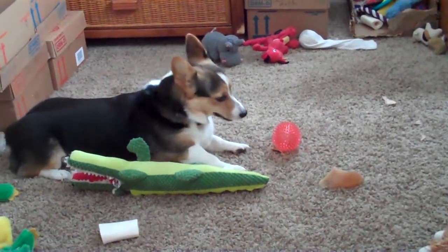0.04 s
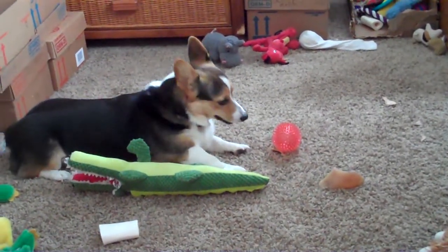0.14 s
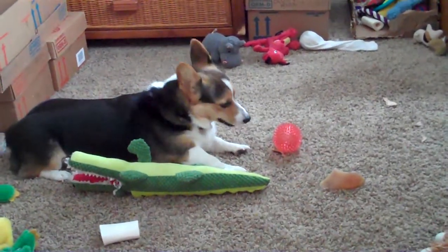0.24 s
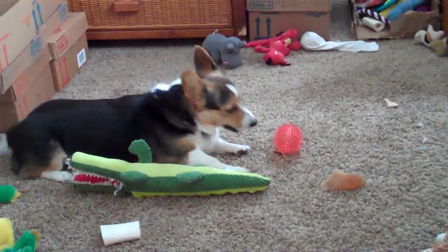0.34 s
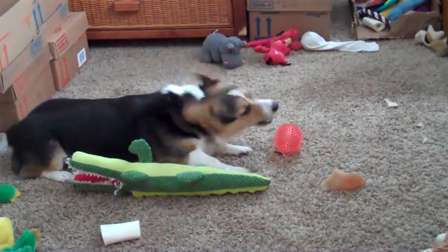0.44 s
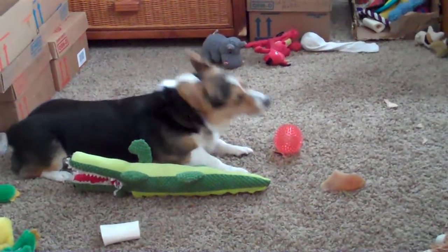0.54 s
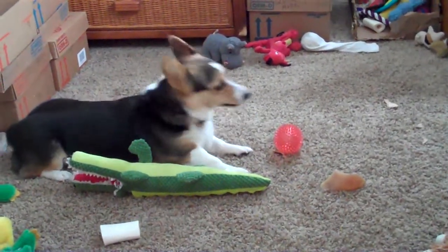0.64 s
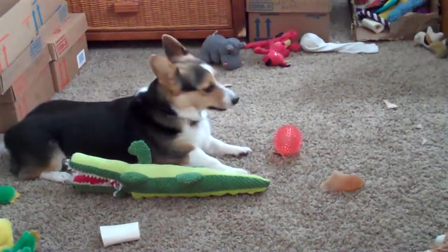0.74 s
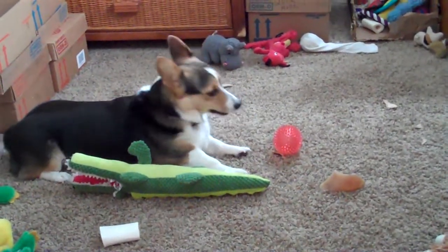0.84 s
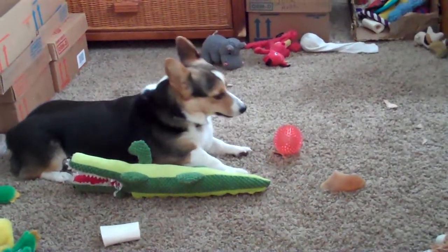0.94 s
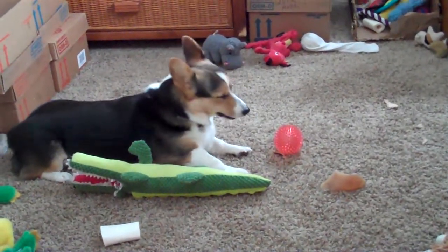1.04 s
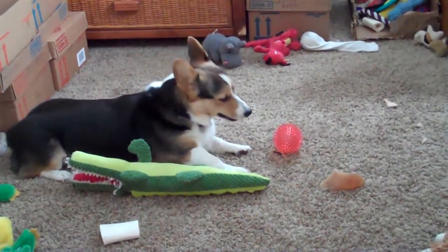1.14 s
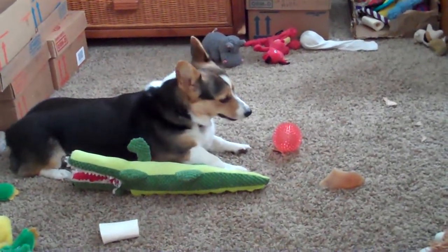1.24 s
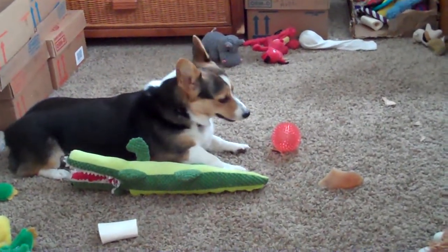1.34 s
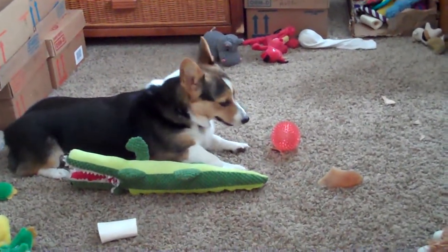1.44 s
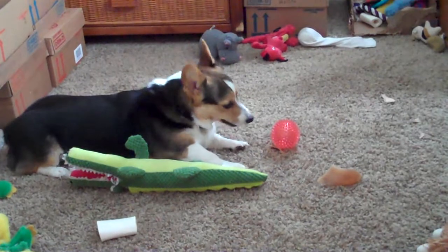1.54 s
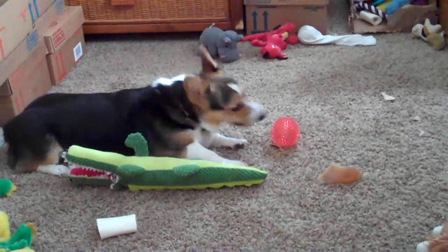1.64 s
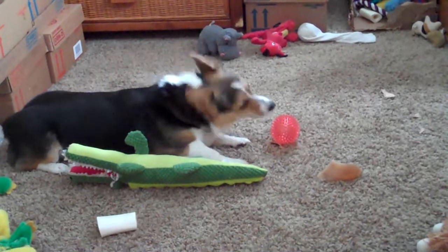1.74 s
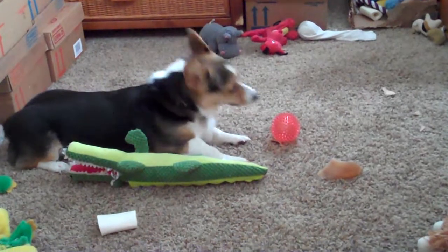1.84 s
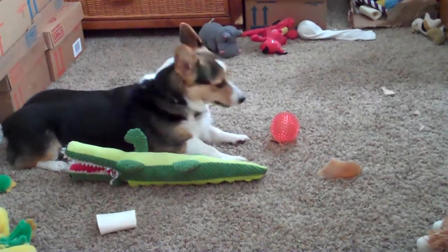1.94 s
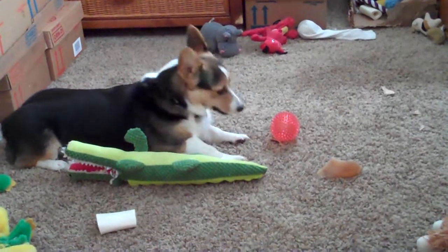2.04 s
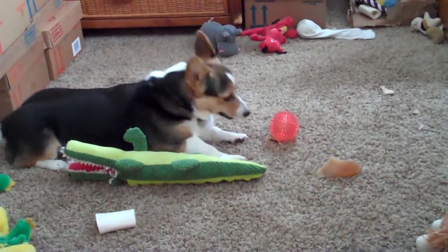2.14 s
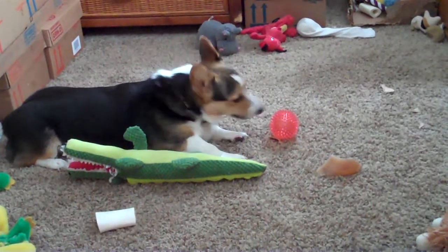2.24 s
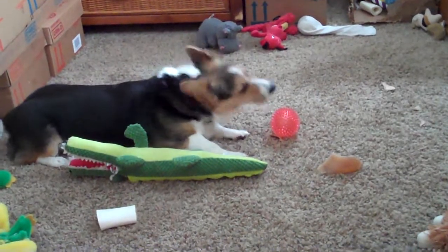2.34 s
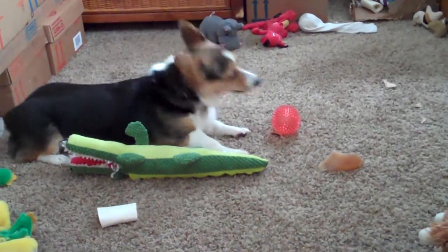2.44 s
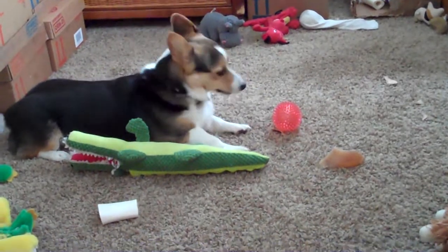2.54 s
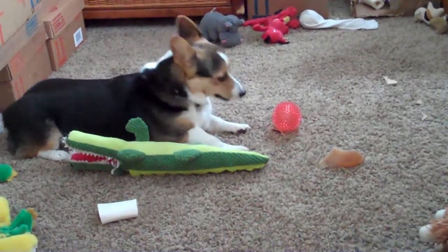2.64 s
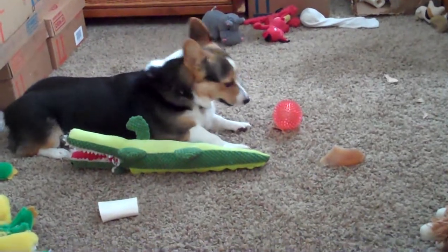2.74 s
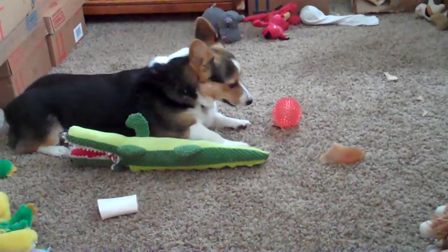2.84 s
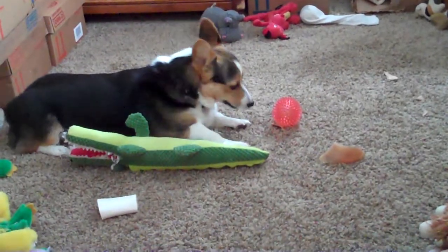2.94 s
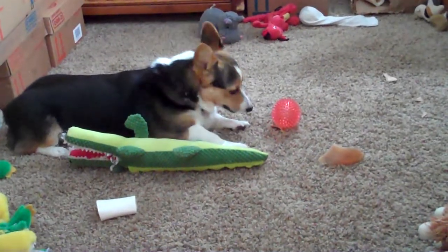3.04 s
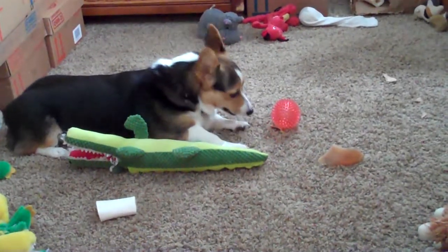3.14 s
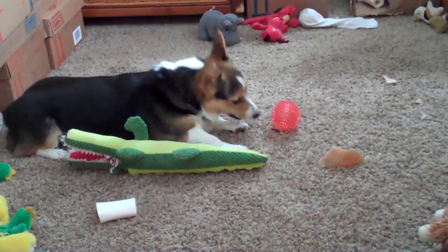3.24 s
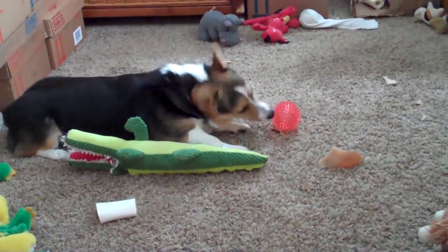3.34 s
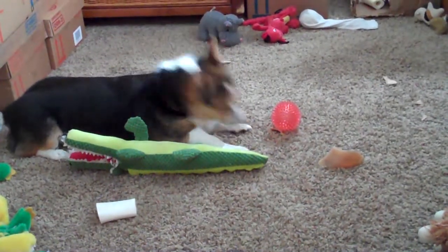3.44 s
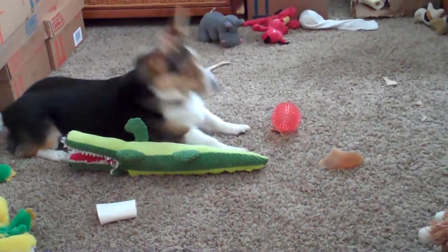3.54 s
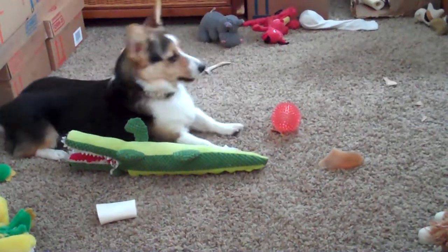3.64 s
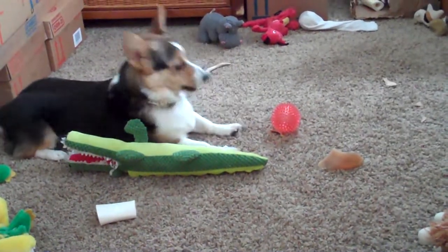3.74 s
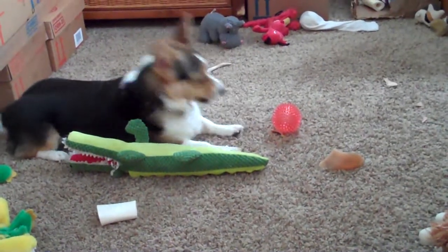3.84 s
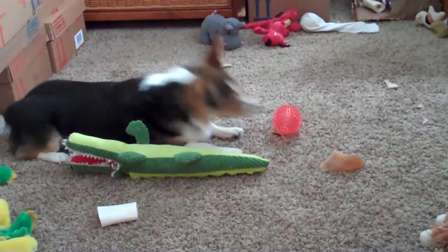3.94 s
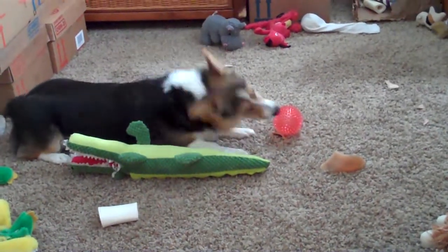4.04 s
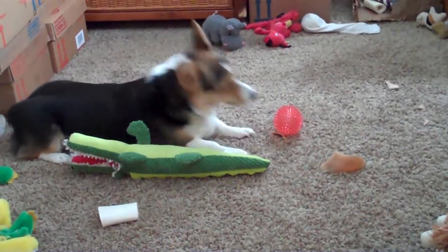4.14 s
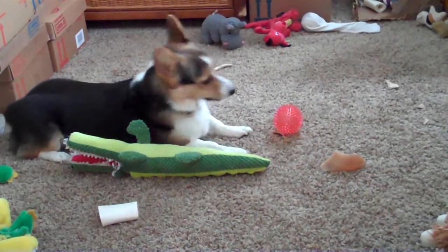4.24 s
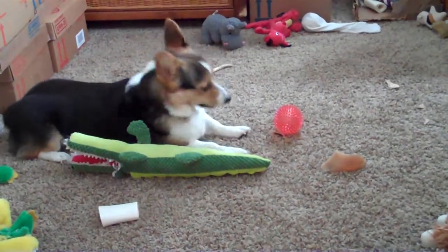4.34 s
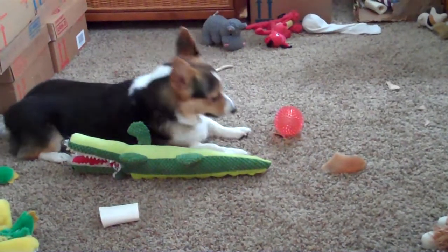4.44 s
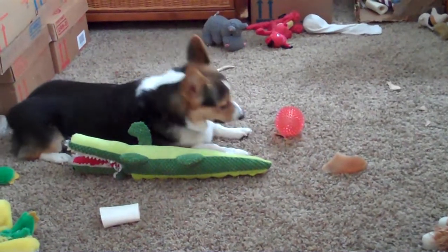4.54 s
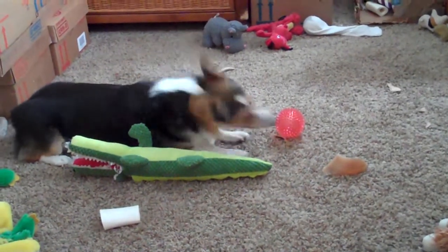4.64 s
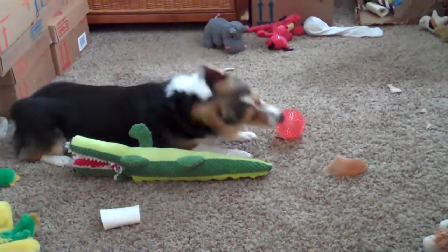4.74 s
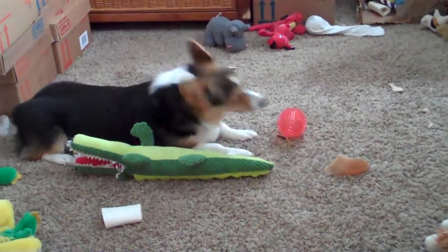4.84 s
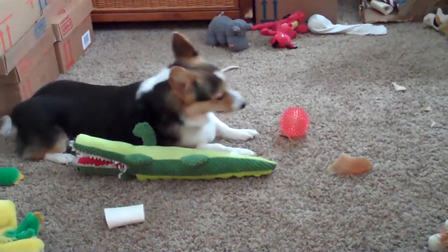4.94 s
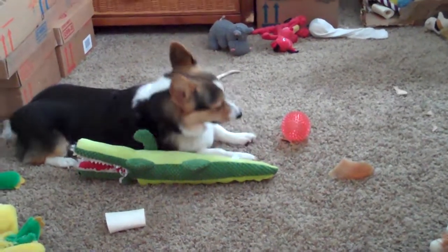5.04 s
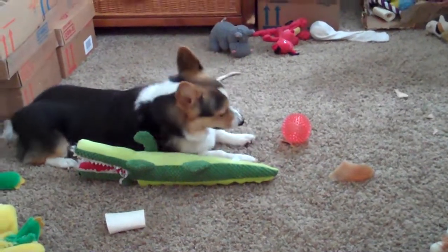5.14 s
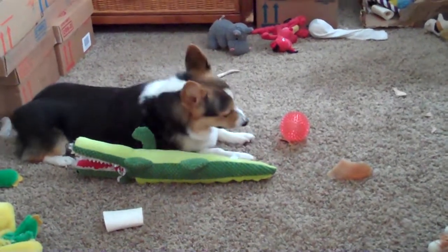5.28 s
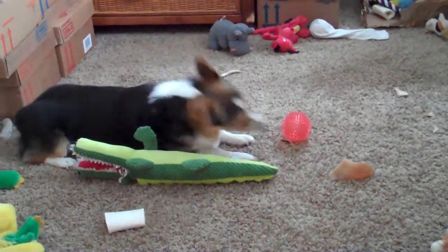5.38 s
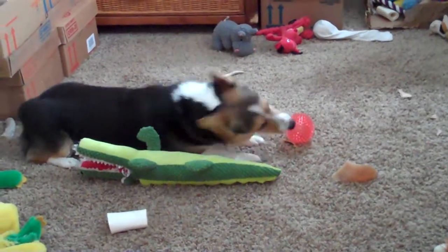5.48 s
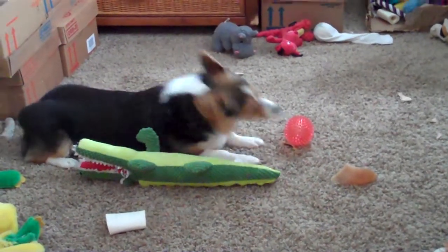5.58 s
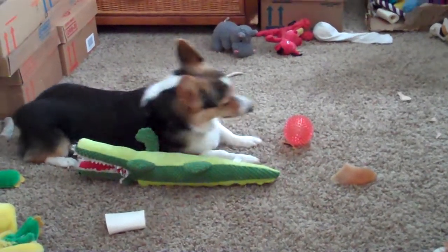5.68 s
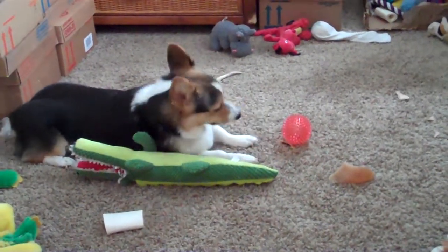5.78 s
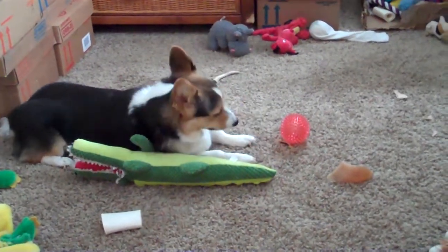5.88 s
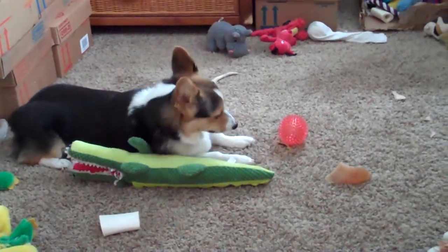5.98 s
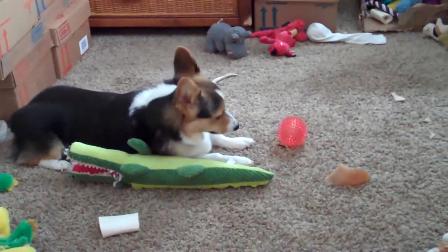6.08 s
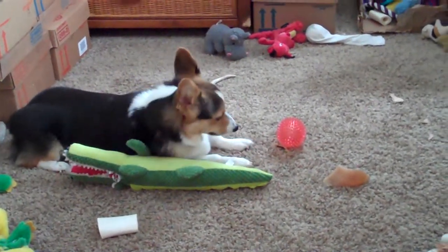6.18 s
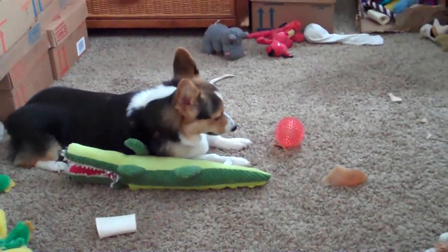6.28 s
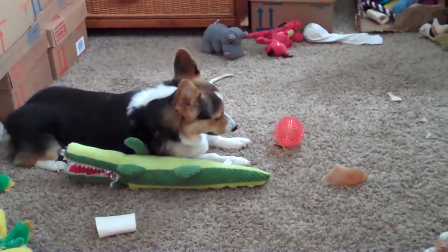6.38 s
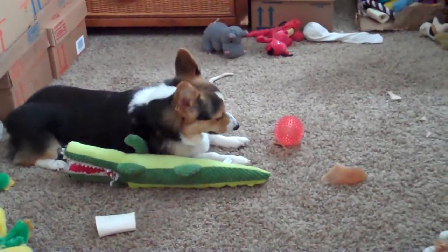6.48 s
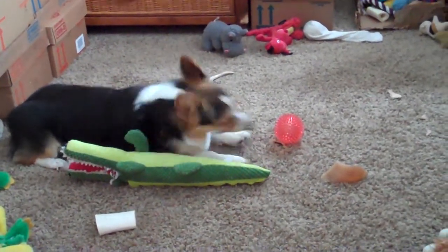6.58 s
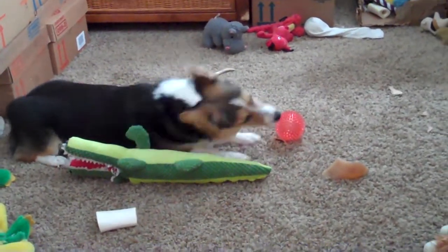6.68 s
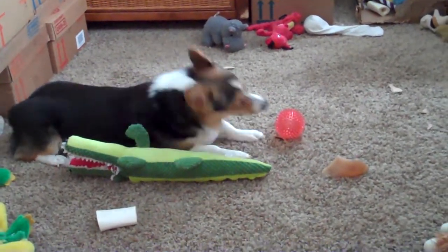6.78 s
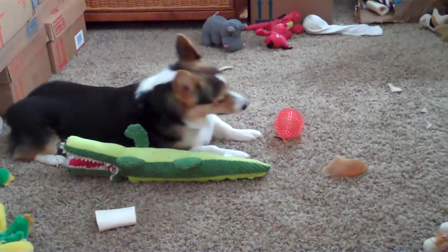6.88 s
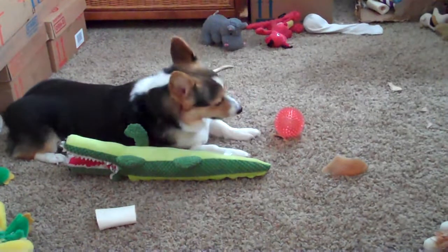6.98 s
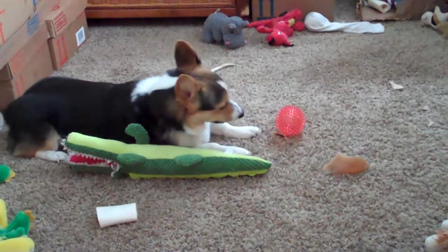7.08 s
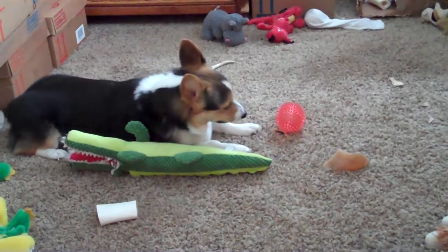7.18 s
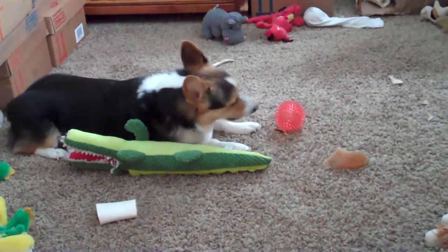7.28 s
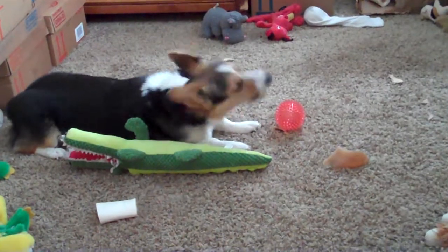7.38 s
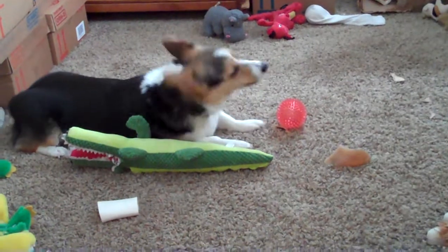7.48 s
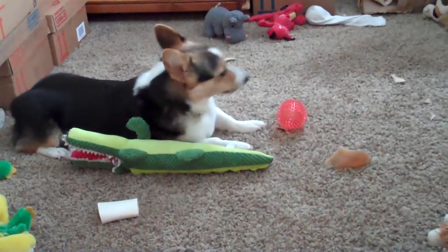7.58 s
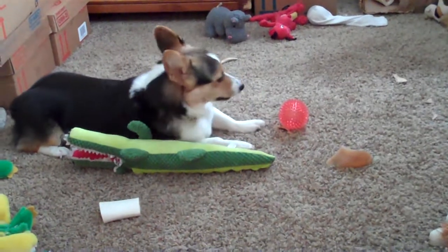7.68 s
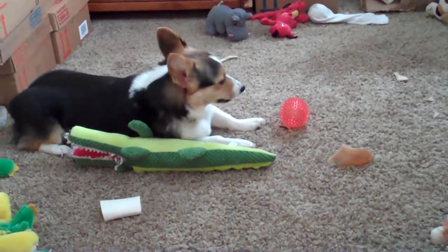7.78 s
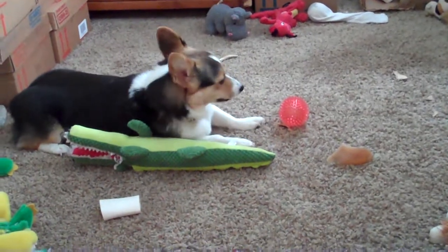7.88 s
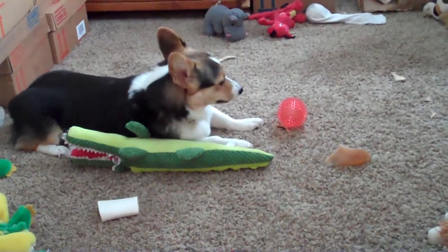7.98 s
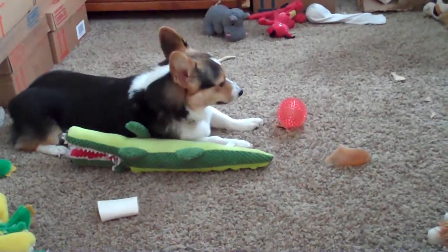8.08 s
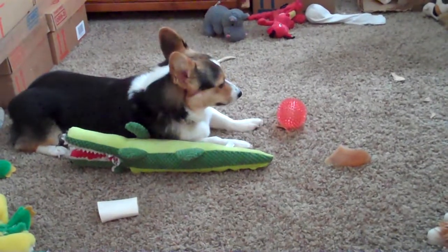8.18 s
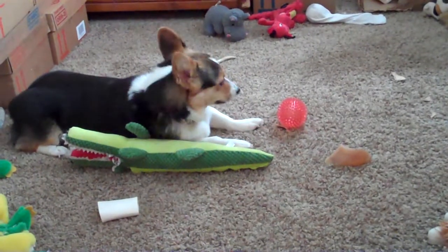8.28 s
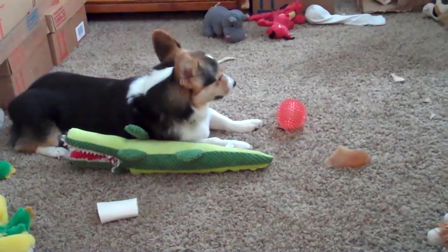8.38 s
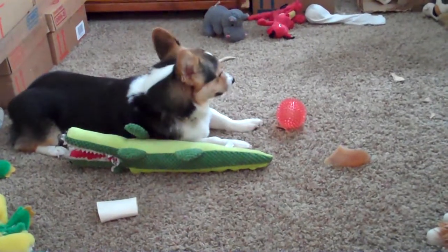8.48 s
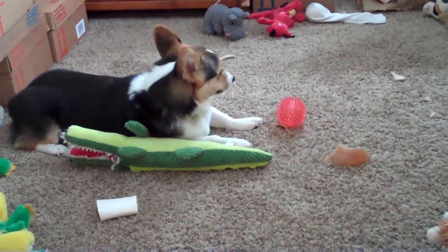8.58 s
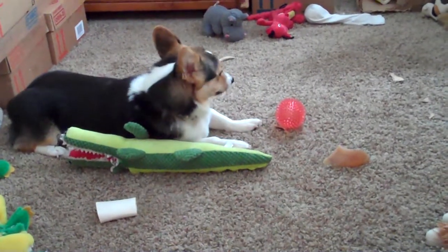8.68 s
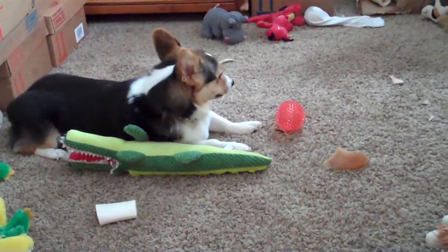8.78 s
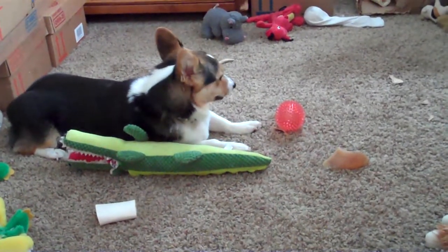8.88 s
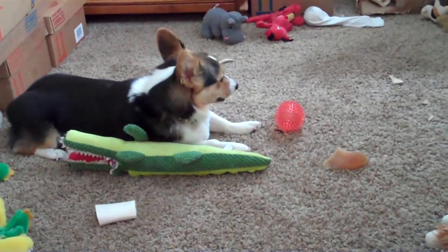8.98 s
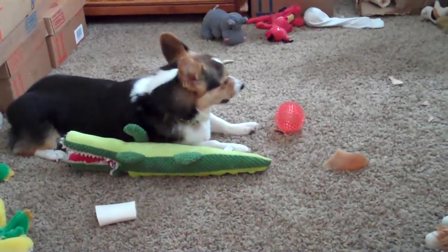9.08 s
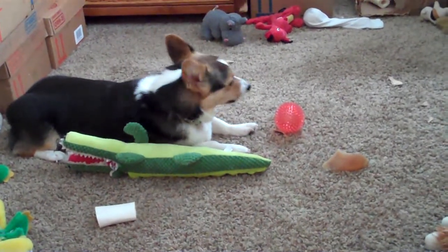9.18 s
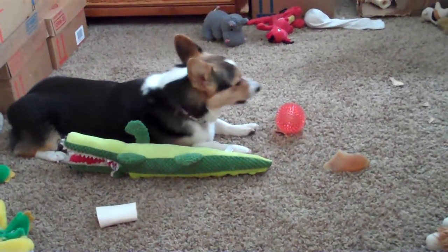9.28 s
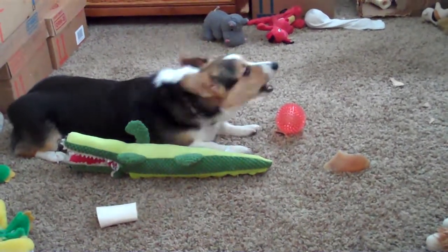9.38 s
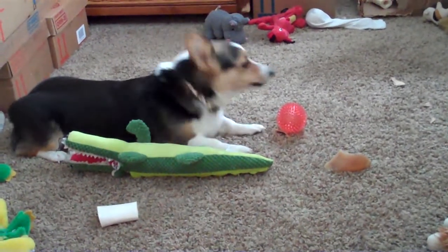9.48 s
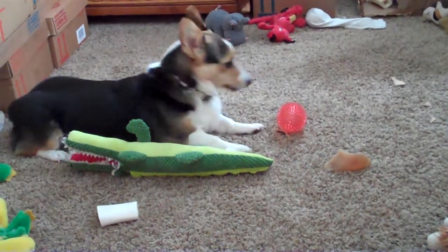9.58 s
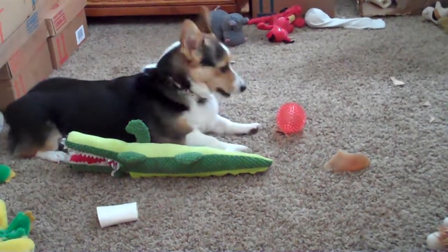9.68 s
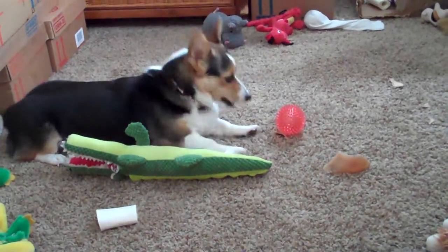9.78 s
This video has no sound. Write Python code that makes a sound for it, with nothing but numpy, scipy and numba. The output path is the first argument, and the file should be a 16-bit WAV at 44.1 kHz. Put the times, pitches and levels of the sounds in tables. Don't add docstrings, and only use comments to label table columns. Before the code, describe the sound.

Quiet hiss, a brief growl, then a loud, abrupt bark from a small dog indoors. Eleven barks come at uneven spacing, some harsh and noisy, others brighter with a falling yelp, the middle ones and the tenth weaker. Between them are muffled grumbles, breathy puffs and dying throat hums. The room is small and softly furnished, heard through a simple microphone with automatic level that lifts faint hiss and hum in pauses.

```python
import sys
import numpy as np
from scipy import signal
from scipy.fft import rfft, irfft
from scipy.io import wavfile
from scipy.ndimage import uniform_filter1d
from numba import njit

SR = 44100
rng = np.random.default_rng(int(sys.argv[2]) if len(sys.argv) > 2 else 0)


def invert_db(x):
    u = np.asarray(x, float) / 20
    return 10 ** u


def pcm_store(signal):
    levels = np.round(np.clip(np.atleast_2d(signal), -1, 1) * 32767)
    wavfile.write(sys.argv[1], SR, levels.astype(np.int16).T)


N = 433062
T = np.arange(N) / SR

# start_s, length_s, start_db, end_db
GROWLS = [
    (.4, .13, -55.5, -41.5),
    (1.658, .072, -63, -42.5),
    (2.266, 0.14, -64.5, -41.5),
    (3.368, 0.057, -64, -44.5),
    (4.68, 0.055, -71.5, -42),
    (5.434, 0.063, -62, -48.5),
    (6.645, .035, -62.5, -42),
    (7.18, 0.14, -60.5, -54),
    (9.3, 0.19, -44, -38.5),
    (7.356, 0.082, -54, -42.5),
]
# resonance_hz, upper_throat_db
GROWL_MOUTHS = [(890, -12), (830, -14), (746, -10), (783, -27), (821.6, -16), (790, -14), (759, -20),
                (680, -21), (677, -13), (730, -24.5)]
GROWL_JITTER = [.12, .2, .15, .3, .3, .3, .3, .02, .2, .25]
GROWL_RATE = 107, 70
GROWL_FADE_IN, GROWL_FADE_DB = 0.4, -16.5
# centre_hz, width_hz, level_db
NOSE = [(222, 180, -2.5), (324, 100, 6.5)]
# centre_hz, width_hz, level_db
THROAT = [(1580, 230, -5), (2600, 330, -3), (3400, 300, -12)]
# centre_hz, width_hz, level_db
HISS = [(5300, 1000, 8), (6400, 1300, 5.5), (9030, 3900, 8), (10900, 3100, 2.5), (12100, 1900, -8.5)]

# catch_s, peak_s, release_s, peak_db, rise_db_per_s
RASPS = [(0.551, 0.586, .602, -8, 951), (1.756, 1.804, 1.806, -7, 1401),
         (2.414, 2.462, 2.535, -15.5, 800.5), (3.429, 3.474, 3.5, -17, 700),
         (4.176, 4.204, 4.225, -15.5, 1199.5), (4.756, 4.78, 4.826, -7.5, 998),
         (5.504, 5.533, 5.588, -8, 1201), (6.701, 6.734, 6.782, -7, 1331.5),
         (7.448, 7.479, 7.595, -11.5, 699.5), (9.164, 9.203, 9.245, -25, 782),
         (9.456, 9.476, 9.592, -10.5, 440)]
# open_hz, closing_hz, tongue_hz, peak_upper_db, late_upper_db
MOUTHS = [(1040, 740, 1800, 1.5, -10), (943, 1015, 1840, -2, -1), (746.5, 510, 1630, 4.5, 1.5),
          (799.6, 750, 1630, -6.5, -8.5), (663, 540, 1730, 4, -5.5), (895, 620, 1450, -5, -20),
          (897, 570, 1400, -4, -18), (855, 710, 1510, -1, -5), (742.6, 690, 1420, 4.5, -9.5),
          (697, 640, 1620, -14.5, -17), (729, 680, 1550, 6.5, -10)]
# catch_hz, peak_hz, late_hz
UPPERS = [(2850, 2200, 1200), (2750, 2900, 2100), (2523, 2550, 2320), (2588, 2800, 2500),
          (2400, 2520, 2500), (2900, 2750, 2350), (3160, 2800, 1200), (3040, 2200, 1300),
          (2450, 2800, 1600), (2520, 2670, 2500), (2415, 2850, 980)]
CATCH_DB = [-5, -12.5, -9.5, -8.5, -13.5, -7, -9.5, -10, -13.5, -9.5, -13.5]
MOUTH_WIDTH_HZ, SHUT_HZ_PER_S = 210, 840
TONGUE_REST_HZ, TONGUE_SETTLE, NARROW_DB = 1480, .6, -11.5
BREATH_DB, BREATH_PER_DB, BREATH_SHUT_DB = -31.5, -0.32, -9
SAG_DB_PER_S, DROP_DB, DROP_S, FALL_DB_PER_S, TAIL_S = 90, -12.5, .02, 271.5, .12

# start_s, length_s
YELP_TIMES = [(.579, .09), (2.443, .026), (4.195, .075), (4.784, .055), (5.534, .066), (6.732, .066),
              (7.48, .062), (9.477, .062), (1.752, .023), (1.788, .09), (2.476, .062), (7.542, .065),
              (9.54, .065)]
# peak_db, start_re_peak_db, end_re_peak_db, swell_s
YELP_EFFORTS = [(-9, -6.5, -14, .016), (-14, -6, -12.5, 0.011), (-21.5, -1.5, -26, 0.024),
                (-8.5, -0.34, -5.5, .008), (-9.5, 0.8, -5.5, .012), (-10, 0.7, -3, 0.011),
                (-5, -5.5, -20.5, 0.021), (-7.5, 0.5, -16, .015), (-18, -6, -11.5, 0.0082),
                (-13, -18, -22, 0.0091), (-20, -4.5, -8, 0.069), (-20.5, 2, -17.5, .02), (-25, -2, -7, .02)]
# start_hz, bend_hz, end_hz, bend_share, overtone_number
YELP_PITCH = [(785, 735, 720, .25, 1), (745, 747, 750, .5, 1), (665, 678, 670, .3, 1),
              (905, 860, 742, .3, 1), (895, 850, 755, .3, 1), (891, 852, 755, .35, 1),
              (705, 757, 757, .25, 1), (712, 757, 745, .2, 1), (942, 955, 970, .5, 1),
              (960, 1070, 985, .48, 2), (1494, 1489, 1481, .5, 3), (630, 680, 660, .4, 2),
              (690, 670, 640, .5, 2)]
HUSH_DB = [-24, -12, -8, -22, -21, -20, -28, -28, -8, -17, -9, -4, -4]
TONGUE_DB = [2, -5, -2.5, -2, -2, 0, -1.5, 0.5, -11.5, -3.5, 11, 13, 3.5]
TILT_DB = [-6, -9.5, -6.5, -9, -6, -4, -3.5, -3, -3.8, 2, 6.5, 4, 4.5]
# centre_hz, half_width_hz, level_db
YELP_THROAT = [(850, 420, 0), (1490, 200, -8), (2280, 260, -10), (2680, 330, -6), (3150, 300, -13)]
WOBBLE = .008

# start_s, peak_s, peak_db, fall_db_per_s, start_resonance_hz
SIGHS = [(.65, .7, -42, 248, 600), (1.864, 1.913, -40, 201.5, 424), (2.536, 2.611, -40.5, 304, 354.4),
         (3.41, 3.534, -30, 411, 399.4), (4.171, 4.231, -34, 304.5, 391.3),
         (4.844, 4.918, -45.5, 202.5, 547), (5.618, 5.693, -47, 270.5, 514.7),
         (6.807, 6.874, -47, 234.5, 513.4), (7.6, 7.66, -46, 203.5, 560), (9.14, 9.19, -38.5, 116, 321),
         (9.6, 9.65, -43, 200.5, 540)]
SIGH_START_DB, SIGH_END_DB, SIGH_REST_HZ = -9.5, -31, 336

# start_s, length_s, level_db, hiss_db
BREATHS = [
    (3.64, .035, -62, -1),
    (4.06, .075, -48, -8),
]
# centre_hz, width_hz, level_db
BREATH_MOUTH = [(733, 190, -5.5), (1160, 300, -1.5)]

ROOM_T60_S, ROOM_DB, ROOM_DAMP = .33, -11, .08
ECHO_S, ECHO_DB, ECHO_T60_S = .525, -56, .6

# start_s, depth_db
DUCKS = [(-.48, -14), (.56, -14), (1.8, -4.5), (2.48, -2), (3.49, -1.8), (4.21, -.6), (4.77, -15),
         (5.52, -15), (6.71, -14), (7.48, -15), (9.48, -12)]
CLIMB_DB_PER_S, HOLD_S, OFFSET, CEILING = 30, .05, .021, .717
# frequency_hz, density_db
AIR = [(12, -32), (20, 0), (27, -14.5), (80, -3.5), (249, -10), (445, -10.5), (674, -11), (1020, -13.5),
       (2410, -15), (13100, -32), (15000, -44.5)]
AIR_DB = -69.5


def level(x, db):
    return x * invert_db(db) / np.sqrt(np.mean(x ** 2))


@njit
def svf(x, hz, width):
    y, b, l = np.empty(len(x)), 0., 0.
    for i in range(len(x)):
        g, k = np.tan(np.pi * hz[i] / SR), width / hz[i]
        v = (b + g * (x[i] - l)) / (1 + g * (g + k))
        b, l, y[i] = 2 * v - b, l + 2 * g * v, k * v
    return y


def band(x, hz, width):
    hz = hz + np.zeros(len(x))
    return svf(svf(x, hz, 1.5 * width), hz, 1.5 * width)


def body(x, modes, patchy_db=0):
    steps = rng.standard_normal((len(x) // 600 + 2, len(modes))).T
    out = np.zeros(len(x))
    for k, (hz, width, db) in enumerate(modes):
        swell = np.interp(np.arange(len(x)) / 600, np.arange(len(steps[k])), steps[k])
        out += (-1) ** k * invert_db(db + patchy_db * swell) * band(x, hz, width)
    return out


def flaps(hz, jitter, scatter_db):
    chance = rng.standard_normal((len(hz) // 20 + 2, 2)).T
    place = np.cumsum(np.exp(jitter * chance[0]))
    at = np.interp(place, np.cumsum(hz) / SR, np.arange(len(hz)), right=-1)
    keep = at >= 0
    whole, part = at[keep].astype(int), at[keep] % 1
    size = invert_db(scatter_db * np.clip(chance[1][keep], -2, 2))
    pulses = np.zeros(len(hz) + 1)
    np.add.at(pulses, whole, size * (1 - part))
    np.add.at(pulses, whole + 1, size * part)
    return pulses[:-1] - pulses.mean()


def play(course, fade):
    s, *columns = np.transpose(course)
    at = slice(int((s[0] - fade) * SR), min(int((s[-1] + fade) * SR), N))
    edge = np.clip(np.minimum(T[at] - s[0], s[-1] - T[at]) / fade + 1, 0, 1)
    return at, np.sin(edge * np.pi / 2) ** 2, [np.interp(T[at], s, c) for c in columns]


def growl_course(s, length, start_db, end_db, mouth_hz, upper_db):
    slow_hz, climb = GROWL_RATE
    return [(s - GROWL_FADE_IN * length, slow_hz, start_db + GROWL_FADE_DB, mouth_hz, upper_db),
            (s, slow_hz, start_db, mouth_hz, upper_db),
            (s + length, slow_hz + climb * length, end_db, mouth_hz, upper_db)]


def growls():
    out = np.zeros(N)
    for growl, mouth, jitter in zip(GROWLS, GROWL_MOUTHS, GROWL_JITTER):
        at, gate, (hz, db, mouth_hz, upper_db) = play(growl_course(*growl, *mouth), fade=.015)
        air = rng.standard_normal(len(hz))
        source = level(flaps(hz, jitter, scatter_db=12 * jitter), 0) + (.1 + 2 * jitter) * air
        hum = body(source, NOSE) + invert_db(-1) * band(source, mouth_hz, 300)
        upper = body(source + .6 * air, THROAT) + invert_db(-23.5) * body(air, HISS)
        out[at] += gate * invert_db(db) * (level(hum, -.1) + invert_db(upper_db) * level(upper, -.1))
    return out


def bark_course(bark, mouth, upper_hz, catch_db):
    catch, peak, free, db, rise = bark
    open_hz, closing_hz, tongue_hz, upper_db, late_db = mouth
    s = [catch - 35 / rise, catch, peak, free, free + DROP_S, free + DROP_S + TAIL_S]
    held = db - SAG_DB_PER_S * (free - peak)
    dropped = held + DROP_DB
    voice_db = np.array([db + catch_db - 35, db + catch_db, db, held, dropped,
                         dropped - FALL_DB_PER_S * TAIL_S])
    mouth_hz = [open_hz, open_hz, (open_hz + closing_hz) / 2, closing_hz, closing_hz,
                closing_hz - SHUT_HZ_PER_S * TAIL_S]
    rest_hz = tongue_hz + TONGUE_SETTLE * (TONGUE_REST_HZ - tongue_hz)
    tongue = np.repeat([tongue_hz, rest_hz], 3)
    upper = np.repeat([upper_db + NARROW_DB, upper_db, late_db], [2, 1, 3])
    shut = np.array([0.51, 0.11, 0, 1.2, 0.62, 2.3])
    hiss_db = BREATH_DB + BREATH_PER_DB * voice_db + BREATH_SHUT_DB * shut
    return np.transpose([s, voice_db, mouth_hz, tongue, np.repeat(upper_hz, [2, 1, 3]), upper, hiss_db])


def rasps(hush_db):
    out = np.zeros(N)
    muzzle = signal.butter(4, [420, 3750], "band", fs=SR, output="sos")
    for bark in zip(RASPS, MOUTHS, UPPERS, CATCH_DB):
        at, gate, columns = play(bark_course(*bark), fade=.01)
        db, mouth_hz, tongue_hz, upper_hz, upper_db, hiss_db = columns
        air = rng.standard_normal((2, len(db)))
        source = level(flaps(.5 * mouth_hz, jitter=.22, scatter_db=2.5), 0) + .6 * air[0]
        low_modes = [(mouth_hz, MOUTH_WIDTH_HZ, 0), (tongue_hz, *THROAT[0][1:])]
        low = signal.sosfilt(muzzle, body(source, low_modes, patchy_db=2.5))
        upper_modes = [(upper_hz, *THROAT[1][1:]), THROAT[2]]
        upper = signal.sosfilt(muzzle, body(source, upper_modes, patchy_db=3.5))
        rush = signal.sosfilt(muzzle, band(air[1], 1700, 1000))
        voice = level(low, -0.75) + invert_db(upper_db) * level(upper, -0.14) + level(rush, -11.5)
        hiss = invert_db(hiss_db) * level(body(air[1], HISS, patchy_db=5), -.1)
        out[at] += gate * invert_db(db) * (invert_db(hush_db[at]) * voice + hiss)
    return out


def yelp_course(s, length, db, start_db, end_db, swell):
    return [(s, db + start_db), (s + min(swell, length - swell / 2), db), (s + length, db + end_db)]


def yelps():
    out, hush_db = np.zeros(N), np.zeros(N)
    order = np.arange(1, 8)[:, None]
    calls = zip(YELP_TIMES, YELP_EFFORTS, YELP_PITCH, HUSH_DB, TONGUE_DB, TILT_DB)
    for (s, length), effort, (*pitch, bend, overtone), hush, tongue_db, tilt_db in calls:
        at, gate, (db,) = play(yelp_course(s, length, *effort), fade=.005)
        glide = np.interp(T[at], s + length * np.array([0, bend, 1]), pitch)
        hz = uniform_filter1d(glide / overtone, size=300)
        drift = np.interp(np.linspace(0, 7, len(hz)), np.arange(8), rng.standard_normal(8))
        hz = hz * (1 + WOBBLE * overtone * drift)
        phase = 2 * np.pi * np.cumsum(hz) / SR
        lift = 0
        for f, w, d in YELP_THROAT:
            ring_db = d + tongue_db * (f == YELP_THROAT[1][0])
            lift = lift + invert_db(ring_db) / (1 + ((order * hz - f) / w) ** 2) ** 2
        size = lift * invert_db(tilt_db * np.log2(order * hz / 800))
        tone = np.sum(size * np.sin(order * phase + order ** 2), axis=0)
        out[at] += gate * invert_db(db) * tone / np.sqrt(np.sum(size ** 2, axis=0) / 2)
        hush_db[at] += gate * hush
    return out, hush_db


def sigh_course(s, peak, db, fall, hz):
    return [(s, db + SIGH_START_DB, hz), (peak, db, (hz + SIGH_REST_HZ) / 2),
            (peak - SIGH_END_DB / fall, db + SIGH_END_DB, SIGH_REST_HZ)]


def sighs():
    out = np.zeros(N)
    for sigh in SIGHS:
        at, gate, (db, hz) = play(sigh_course(*sigh), fade=0.032)
        source = level(flaps(.5 * hz, jitter=.25, scatter_db=4), 0) + .5 * rng.standard_normal(len(hz))
        hum = band(source, hz, 240) + 0.74 * band(source, hz + hz / 2, 160)
        out[at] += gate * invert_db(db) * level(hum, -1.5)
    return out


def breaths():
    out = np.zeros(N)
    for s, length, db, hiss_db in BREATHS:
        at, gate, (puff_db,) = play([(s, db), (s + length, db - 3)], fade=0.022)
        air = rng.standard_normal(len(puff_db))
        throat = level(body(air, BREATH_MOUTH + THROAT, patchy_db=5.0), 0)
        hiss = level(body(air, HISS, patchy_db=4), hiss_db)
        out[at] += gate * invert_db(puff_db) * (throat + hiss)
    return out


@njit
def walls(x, lags, gain, damp):
    line, soft, out = np.zeros((8, 4096)), np.zeros(8), np.zeros(len(x))
    for i in range(len(x)):
        total = 0.
        for k in range(8):
            soft[k] += (1 - damp) * (gain[k] * line[k, (i - lags[k]) & 4095] - soft[k])
            total += soft[k]
            out[i] += soft[k] * (1 - 2 * (k % 2))
        for k in range(8):
            line[k, i & 4095] = x[i] + 1e-18 + soft[k] - total / 4
    return out


def room(dog):
    lags = np.array([211, 347, 499, 641, 827, 1013, 1259, 1493])
    thin = signal.lfilter(*signal.butter(1, 800, "high", fs=SR), dog)
    near = walls(thin, lags, invert_db(-3 * 20 * lags / SR / ROOM_T60_S), ROOM_DAMP)
    late = np.roll(band(dog, 1800, 1800), int(ECHO_S * SR))
    far = late + .4 * walls(late, 2 * lags + 1, invert_db(-3 * 20 * 2 * lags / SR / ECHO_T60_S), .2)
    return invert_db(ROOM_DB) * near + invert_db(ECHO_DB) * far


def scene():
    tones, hush_db = yelps()
    dog = growls() + rasps(hush_db) + tones + sighs() + breaths()
    return (dog + room(dog))[None]


def gain_db():
    dips = []
    for s, db in DUCKS:
        climb = CLIMB_DB_PER_S * np.maximum(T - s - HOLD_S, 0)
        dips.append(np.where(T > s, np.minimum(db + climb, 0), 0))
    return uniform_filter1d(np.min(dips, axis=0), size=900)


def hiss_and_hum(db):
    lag = 1 / (.35 * SR)
    behind_db = -signal.lfilter([lag], [1, lag - 1], db)
    hz, shape_db = np.transpose(AIR)
    bins = np.maximum(np.fft.rfftfreq(N, 1 / SR), 1)
    shape = invert_db(np.interp(np.log(bins), np.log(hz), shape_db))
    hiss = irfft(rfft(rng.standard_normal(N)) * shape, N)
    hum = invert_db(-100 + 2.5 * behind_db) * np.sin(2 * np.pi * 118 * T)
    return invert_db(db) * (level(hiss, AIR_DB) * invert_db(0.1 * behind_db) + hum)


def low_pass(x):
    return signal.sosfilt(signal.butter(12, 15700, fs=SR, output="sos"), x)


def record(dry):
    db = gain_db()
    rounded = CEILING * np.tanh((np.abs(dry) / CEILING) ** 3) ** (1 / 3) * np.sign(dry)
    voice = signal.sosfilt(signal.butter(6, 13800, fs=SR, output="sos"), rounded)
    offset = OFFSET * (invert_db(db) - invert_db(db[0]))
    drift = signal.lfilter(*signal.butter(1, 1.3, "high", fs=SR), offset)
    mix = voice + drift + hiss_and_hum(db)
    return low_pass(mix)


dry = scene()
out = record(dry)
pcm_store(out)
```